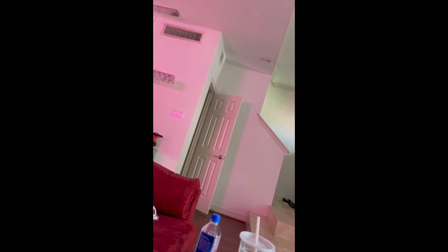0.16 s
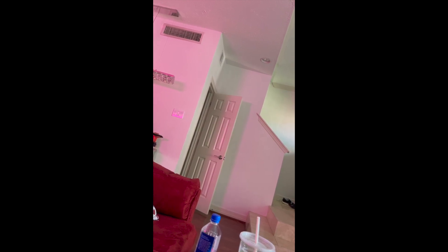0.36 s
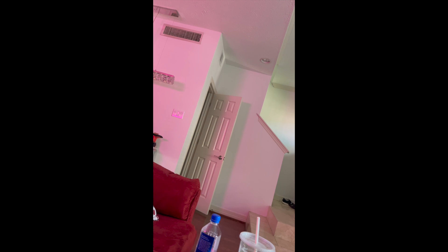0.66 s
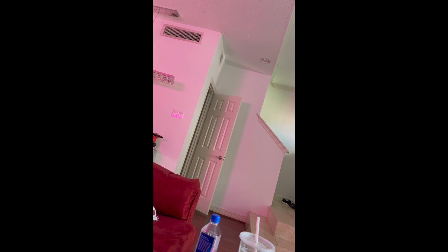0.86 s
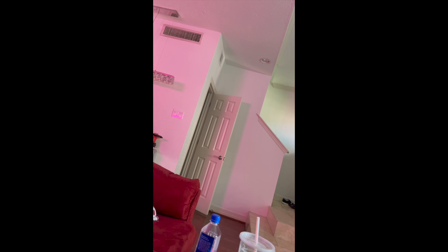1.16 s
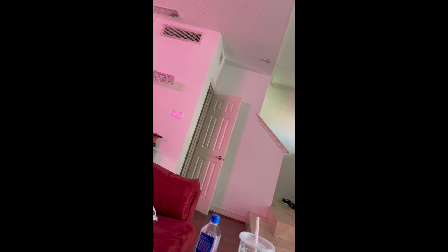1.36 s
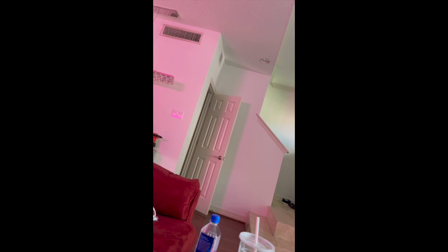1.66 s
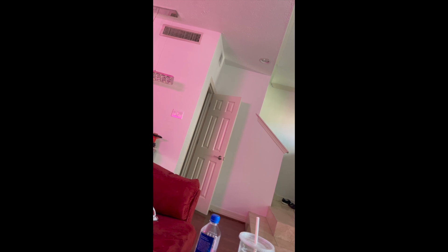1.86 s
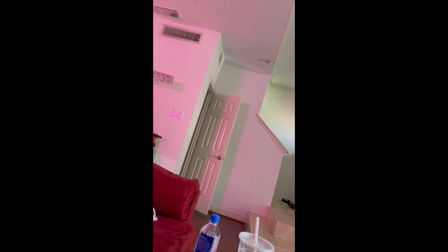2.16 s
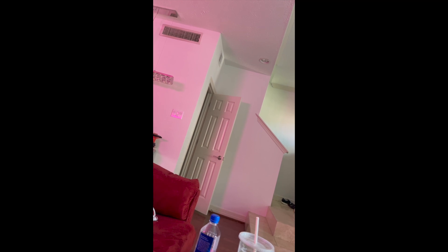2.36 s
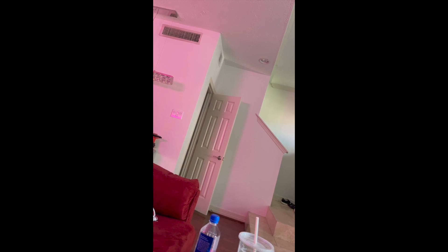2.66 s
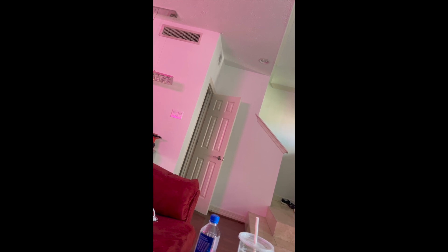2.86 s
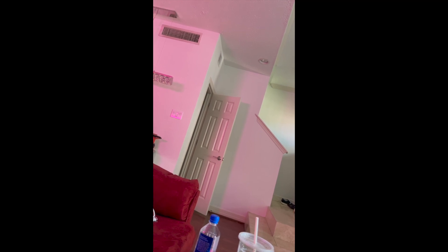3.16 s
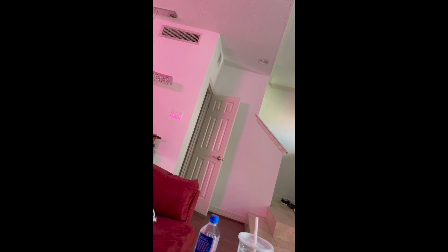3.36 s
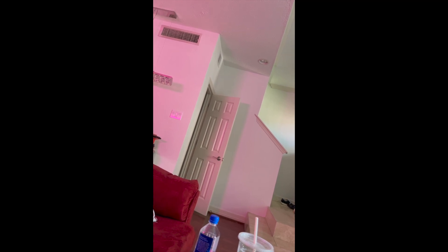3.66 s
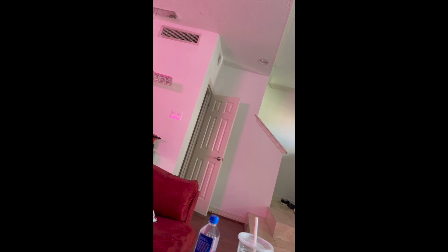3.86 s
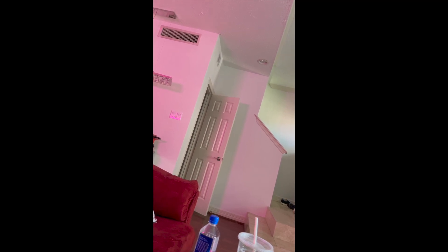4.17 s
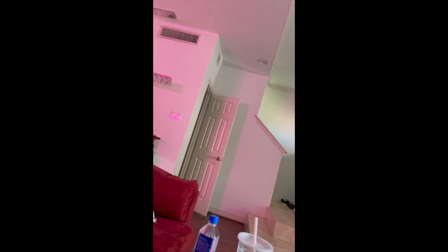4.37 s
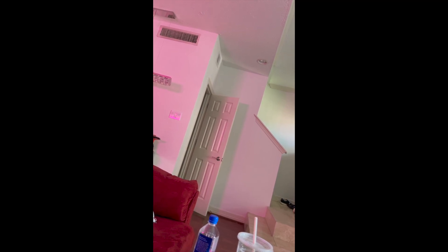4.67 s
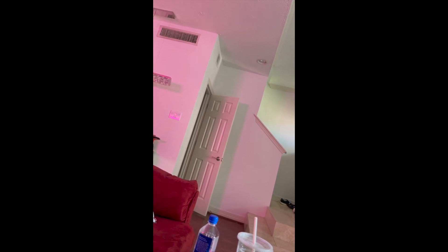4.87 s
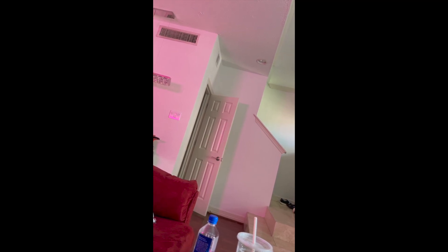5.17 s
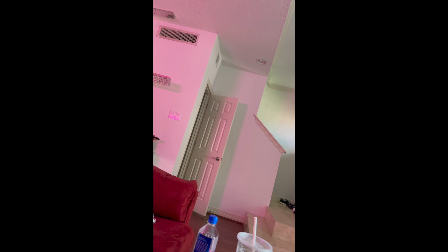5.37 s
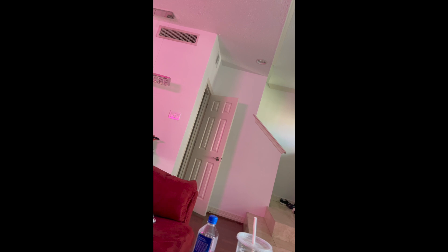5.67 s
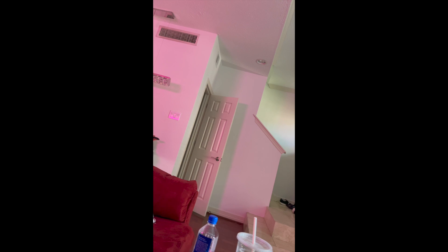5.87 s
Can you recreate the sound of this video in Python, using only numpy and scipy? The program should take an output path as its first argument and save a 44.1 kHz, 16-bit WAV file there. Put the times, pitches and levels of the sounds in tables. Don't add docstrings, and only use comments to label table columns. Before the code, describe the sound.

A hammer drill bursts through the wall for about two seconds, buzzing and gritty, over a steady low room hum and faint cloth rustles.

```python
import sys
import numpy as np
from scipy import signal
from scipy.fft import rfft, irfft, next_fast_len
from scipy.io import wavfile

SR = 44100
rng = np.random.default_rng(int(sys.argv[2]) if len(sys.argv) > 2 else 0)


def field_ratio(decibels):
    return 10 ** (np.asarray(decibels, dtype=float) / 20)


def wrap_up_sound(samples):
    columns = np.atleast_2d(samples).T
    tamed = np.clip(columns, -1, 1)
    steps = np.round(tamed * 32767).astype(np.int16)
    wavfile.write(sys.argv[1], SR, steps)


N = 264898

# (frequency [Hz], peak [dB], left over right [dB], wander [dB], start phase [turns])
HUM = [(55.107, -52, .8, .4, .36), (58.477, -56.5, .8, .6, .22), (58.761, -57, .8, .6, .62),
       (59.95, -55, .8, .5, .39), (116.933, -47.5, 1.5, .5, .68), (119.885, -66, 1.5, 1.5, .98),
       (165.3, -70, 3.0, 1.5, .1), (175.3, -67, 3.5, 1.5, .5), (204.6, -69, 4.0, 1.5, .3),
       (221.6, -70, 4.0, 1.5, .8), (277.6, -70, 5.0, 1.5, .6), (292.3, -68, 5.5, 1.1, .2),
       (323.9, -69, 6.0, 1.1, .9), (415.7, -67, 5.5, 1.1, .4), (475.0, -66, 5.0, 1.1, .7)]
# (frequency [Hz], level [dB/Hz])
VENT_MID = [(20, -32), (45, -7), (122, -10.5), (168, -14), (362, -21), (700, -28), (1640, -42),
            (2930, -46.5), (4500, -57.5), (7600, -63), (8700, -70.5), (11200, -73), (12800, -61),
            (14000, -64.5)]
VENT_SIDE = [(30, -32), (60, -14.5), (122, -1.5), (283, -9.5), (478, -4), (689, -6), (1330, -20),
             (1880, -24), (4800, -38), (6700, -45), (9400, -36.5), (11900, -45), (14000, -49.5)]
# (frequency [Hz], share of mid in side [1])
VENT_LEAN = [(60, 0.039), (200, 0.12), (370, 0.52), (670, 0.17), (1200, .05), (14000, .01)]
# (frequency [Hz], width [Hz], level [dB])
GRILLE = [(1854, 180, -79), (2670, 220, -92), (3520, 390, -89.5), (6110, 260, -105)]
# (middle [s], spread [s], level [dB])
RUSTLES = [
    (.36, .07, -81.5),
    (.7, 0.11, -77),
    (.84, .1, -85.5),
    (1.17, 0.054, -93),
    (1.63, 0.047, -75),
    (4.36, 0.07, -82),
    (5.4, 0.064, -80.5),
]
# (frequency [Hz], level [dB/Hz])
RUSTLE_SPECTRUM = [(1200, -11.5), (2000, 1.5), (2700, -2.5), (4200, -3.5), (5000, -15.5), (8000, -27),
                   (11000, -39), (13000, -19)]
# (start [s], length [s], level [dB])
WHISTLES = [
    (0.411, 0.19, -91),
    (0.655, 0.16, -94),
    (1.083, 0.1, -95),
            (5.09, 0.062, -90),
    (5.442, 0.044, -92),
    (5.663, 0.14, -85),
]
WHISTLE_HZ, WHISTLE_WIDTH_HZ = 6170, 210

# (time [s], rate [blows/s])
BLOW_RATE = [
    (1.75, 50.0),
    (2.3, 50.9),
    (2.45, 51.65),
    (2.92, 51.83),
    (3.0, 51.68),
    (3.25, 51.83),
    (3.4, 51.66),
    (3.84, 51.75),
    (4.08, 50.8),
]
# (start [s], end [s])
BITE_S = (2.33, 3.87)
# (time [s], level [dB])
MOTOR = [
    (1.7, -50),
    (1.71, -33),
    (1.74, -33.5),
    (1.92, -10.5),
    (2.16, -3.5),
    (2.36, -0.5),
    (3.91, -0.5),
    (4.11, -24.5),
    (4.31, -51),
]
# (time [s], level [dB])
PUSH = [
    (2.3, -1.5),
    (2.37, 2.5),
    (2.5, 0.9),
    (2.69, 3),
    (3.02, 0.85),
    (3.25, 3),
    (3.5, -4),
    (3.68, 1.5),
    (3.9, -3.2),
]
# (time [s], spread [s], multiple
# [1], spread [1], level [dB])
SINKING = [
    (2.42, .06, 15.0, 3.5, 7),
    (2.4, 0.37, 23.0, 1.6, -6.5),
    (2.6, 0.48, 33.0, 4.6, 2),
    (3.25, .15, 24.0, 2.6, 1),
    (3.5, 0.074, 42.0, 14, -5),
    (3.78, 0.22, 23.0, 3.9, 1.5),
    (4.02, 0.12, 7.5, 2.5, 7),
]
# (multiple of blow rate [1], left [dB], right [dB], left lead [rad])
WALL = [(2, -55, -57, 0.1), (4, -47, -51, -0.0), (5, -65, -65, 0.3), (7, -46, -54, -0.4),
        (8, -41, -46, -0.6), (9, -47, -53, -0.0), (10, -56, -55, -2.9), (11, -60, -52, -2.1),
        (12, -55, -47, 2.2), (13, -53, -48, 0.6), (14, -52, -52, -0.6), (15, -56, -53, 0.3),
        (16, -45, -51, -1.5), (17, -50, -56, -0.5), (18, -50, -54, 1.9), (19, -49, -50, -1.2),
        (20, -50, -43, 0.2), (21, -56, -52, 2.6), (22, -50, -47, 0.2), (23, -44, -46, -0.7),
        (24, -48, -50, -2.3), (25, -44, -44, -0.1), (26, -52, -51, -1.9), (27, -57, -49, 0.3),
        (28, -57, -54, -2.9), (29, -53, -48, -1.4), (30, -47, -48, 0.0), (31, -43, -43, -0.0),
        (32, -50, -44, -1.9), (33, -55, -43, -0.6)]
CEILING = [(34, -48, -49, -0.8), (35, -51, -49, 0.1), (36, -47, -50, -0.5), (37, -46, -49, 0.1),
           (38, -52, -53, -0.6), (39, -55, -56, -0.5), (40, -56, -63, -0.8), (41, -56, -50, 1.4),
           (42, -50, -50, 1.2), (43, -54, -57, -1.5), (44, -46, -56, -1.4), (45, -51, -57, 2.9),
           (46, -50, -49, -0.5), (47, -50, -53, 1.1), (48, -54, -54, -1.1), (49, -50, -52, -0.5),
           (50, -56, -54, -2.1), (51, -54, -51, 0.3), (52, -57, -54, -0.3), (53, -51, -50, 2.5),
           (54, -51, -58, 2.6), (55, -60, -56, -0.3), (56, -54, -51, -2.6), (57, -58, -50, -1.6),
           (58, -58, -55, -0.8), (59, -55, -53, -0.3), (60, -60, -55, -0.1), (61, -58, -61, 0.1),
           (62, -62, -59, -1.9), (63, -59, -64, 1.1)]
MODE_WIDTH_HZ = 20.8
# (frequency [Hz], level [dB])
RATTLE = [(2700, -41), (3300, -2), (3800, 2), (4400, 3.5), (5000, -8.5), (6000, -21.5), (7500, -21.5)]
# (frequency [Hz], level [dB/Hz])
GRIND_MID = [(88, -42.5), (150, -7), (252, 2), (380, -2.5), (510, -1.5), (680, 2), (1000, -0.5), (1650, 3),
             (2200, -5), (3000, -28.5), (4500, -35)]
GRIND_SIDE = [(88, -49.5), (150, -13), (380, -2.5), (930, 0), (1500, 1.5), (2200, -14), (3000, -21),
              (4500, -31)]
GRIT_MID = [(1200, -6.5), (2000, 0), (2700, 1), (3300, -5), (4440, -7), (4970, -12), (5400, -14.5),
            (6800, -31), (8800, -45)]
GRIT_SIDE = [(1200, -31), (2000, -5.5), (2800, -6), (3900, -14), (4760, -15), (5400, -22), (7000, -45)]
AIR_MID = [(3500, -35.5), (5200, -7), (6700, -11.5), (7500, -5.5), (8980, -0.5), (9800, -5.5), (10300, -24),
           (11000, -8), (11800, -10.5), (12700, -11.5), (13300, -17), (14000, -29.5)]
AIR_SIDE = [(3240, -51), (5500, -18), (6660, -26), (7550, -8.5), (8960, 4), (11700, -6.5), (13200, -27),
            (14000, -46)]
BLOW_DB, GRIND_DB, GRIT_DB, AIR_DB = -46.5, -37.5, -43.5, -47
SPIN_SHARES = (.85, 0.83, 0.71, 0.99)
PUSH_SHARES = (.5, .85, 1.2, .4)
FIRST_BLOW_DB, FIRST_BLOW_S = 9.5, 0.02
CLEARS_S, CLEARS_OVER_S, CLEARS_DB = 3.7, 0.09, -8


def in_time(rows):
    s, *columns = np.transpose(rows)
    return [np.interp(np.arange(N) / SR, s, column) for column in columns]


def at_hz(points, hz):
    point_hz, value = np.transpose(points)
    return np.interp(np.log(hz + 1), np.log(point_hz), value)


def rms_one(x):
    return x / np.sqrt(np.mean(x ** 2) + 1e-20)


def weigh(x, gain_at):
    size = next_fast_len(len(x))
    gain = gain_at(np.fft.rfftfreq(size, 1 / SR))
    return irfft(rfft(x, size) * gain, size)[:len(x)]


def colour(x, spectrum):
    return weigh(x, lambda hz: field_ratio(at_hz(spectrum, hz)))


def drift(rate_hz):
    r = np.exp(-128 * np.pi * rate_hz / SR)
    noise = rng.standard_normal(N // 64 + 2002)
    slow = signal.lfilter([1], [1, -2 * r, r * r], noise)[2000:]
    return np.interp(np.arange(N) / 64, np.arange(len(slow)), rms_one(slow - slow.mean()))


def stereo_noise(mid_spectrum, side_spectrum, side_db):
    mid = rms_one(colour(rng.standard_normal(N), mid_spectrum))
    side = field_ratio(side_db) * rms_one(colour(rng.standard_normal(N), side_spectrum))
    return np.array([mid + side, mid - side])


def hum():
    t, out = np.arange(N) / SR, np.zeros((2, N))
    for hz, peak_db, pan_db, wander_db, turns in HUM:
        level = field_ratio(peak_db + wander_db * drift(0.072))
        tone = level * np.sin(2 * np.pi * (hz * t + turns))
        out += tone * field_ratio(np.array([[0.5], [-0.5]]) * pan_db)
    return out


def ventilation(level_db, side_db):
    mid = rms_one(colour(rng.standard_normal(N), VENT_MID))
    lean = weigh(mid, lambda hz: at_hz(VENT_LEAN, hz))
    side = lean + field_ratio(side_db) * rms_one(colour(rng.standard_normal(N), VENT_SIDE))
    gust = field_ratio(0.6 * drift(1.5))
    return field_ratio(level_db) * gust * np.array([mid + side, mid - side])


def grille(wander_db):
    out = np.zeros((2, N))
    for hz, width_hz, level_db in GRILLE:
        edges_hz = [hz - width_hz / 2, hz + width_hz / 2]
        band = signal.butter(2, edges_hz, "band", fs=SR, output="sos")
        level = field_ratio(level_db + wander_db * drift(4.1))
        out += level * rms_one(signal.sosfilt(band, rng.standard_normal((2, N))))
    return out


def swells(rows):
    t = np.arange(N) / SR
    return sum(field_ratio(db) * np.exp(-((t - s) / spread_s) ** 2) for s, spread_s, db in rows)


def rustles():
    patches = field_ratio(2.5 * drift(25.0))
    return swells(RUSTLES) * patches * stereo_noise(RUSTLE_SPECTRUM, RUSTLE_SPECTRUM, side_db=-1.0)


def whistles(level_db):
    r = np.exp(-np.pi * WHISTLE_WIDTH_HZ / SR)
    poles = [1, -2 * r * np.cos(2 * np.pi * WHISTLE_HZ / SR), r * r]
    mid, side = rng.standard_normal((2, N))
    tone = mid + 0.3 * side * np.array([[1], [-1]])
    for _ in range(2):
        tone = signal.lfilter([1, 0, -1], poles, tone)
    draughts = [(s + length_s / 2, 0.42 * length_s, db + level_db)
                for s, length_s, db in WHISTLES]
    return rms_one(tone) * swells(draughts)


def effort():
    t, motor_db, push_db = np.arange(N) / SR, in_time(MOTOR)[0], in_time(PUSH)[0]
    layers = zip((BLOW_DB, GRIND_DB, GRIT_DB, AIR_DB), SPIN_SHARES, PUSH_SHARES)
    blow_db, grind_db, grit_db, air_db = [db + spin * motor_db + lean * push_db
                                          for db, spin, lean in layers]
    blow_db = blow_db + FIRST_BLOW_DB * np.exp(-np.abs(t - BITE_S[0]) / FIRST_BLOW_S)
    grit_db = grit_db + CLEARS_DB * np.clip((t - CLEARS_S) / CLEARS_OVER_S, 0, 1)
    return blow_db, grind_db, grit_db, air_db


def stroke_turns():
    return np.cumsum(in_time(BLOW_RATE)[0]) / SR


def blows(jitter_s, loose_jitter_s, uneven_db, idle_db):
    turns = stroke_turns()
    count = int(turns[-1])
    chance = rng.standard_normal((400, 2))[:count]
    at = np.interp(np.arange(count), turns, np.arange(N))
    loose = (at < BITE_S[0] * SR) | (at > BITE_S[1] * SR)
    running = (at > BLOW_RATE[0][0] * SR) & (at < BLOW_RATE[-1][0] * SR)
    settling_s = 0.00015 * np.exp(-np.abs(at / SR - BITE_S[0]) / 0.06)
    spread_s = np.where(loose, loose_jitter_s, jitter_s + settling_s)
    at = at + spread_s * SR * chance[:, 0]
    clicks = np.full(N, 1e-18)
    index = np.clip(np.round(at).astype(int), 0, N - 1)
    clicks[index] = field_ratio(uneven_db * chance[:, 1] + idle_db * loose) * running
    return clicks


def modes(clicks, table, wander_db, level_db):
    out, r = np.zeros((2, N)), np.exp(-np.pi * MODE_WIDTH_HZ / SR)
    start, stop = int(1.6 * SR), int(4.4 * SR)
    at = np.flatnonzero(clicks[start:stop] > 1e-15)
    stroke = np.exp(2j * np.pi * stroke_turns())[start:stop]
    s, spread_s, middle, spread, db = np.transpose(SINKING)
    seating = np.exp(-(((start + at[:, None]) / SR - s) / spread_s) ** 2)
    overtone, reached = np.ones(stop - start, complex), 0
    for multiple, left_db, right_db, lead_rad in table:
        overtone = overtone * stroke ** int(multiple - reached)
        reached = multiple
        bloom_db = seating @ (db * np.exp(-((multiple - middle) / spread) ** 2))
        coupling_db = bloom_db + wander_db * np.sqrt(multiple) * drift(7.7)[start + at]
        fed = np.full(stop - start, 1e-18, complex)
        fed[at] = clicks[start + at] * field_ratio(coupling_db) / overtone[at]
        gain = (1 - r) ** 2 * np.exp(2j * np.pi * rng.random())
        ringing = overtone * signal.lfilter([gain], [1, -2 * r, r * r], fed)
        out[0, start:stop] += field_ratio(left_db + level_db) * ringing.real
        out[1, start:stop] += field_ratio(right_db + level_db) * (ringing * np.exp(-1j * lead_rad)).real
    return out


def rattle(clicks, t60_s, wander_db, level_db, side_db):
    t = np.arange(SR // 2) / SR
    out = np.zeros((2, N))
    for path in range(3):
        fed = clicks * field_ratio(wander_db * drift(4.9))
        for part in range(2):
            noise = rms_one(colour(rng.standard_normal(len(t)), RATTLE))
            out[part] += signal.fftconvolve(fed, noise * field_ratio(-60 * t / t60_s))[:N]
    mid, side = out[0], field_ratio(side_db) * out[1]
    return field_ratio(level_db) * np.array([mid + side, mid - side])


def drill():
    blow_db, grind_db, grit_db, air_db = effort()
    clicks = blows(jitter_s=0.00003, loose_jitter_s=0.0015, uneven_db=1.4, idle_db=-1.5)
    struck = modes(clicks * field_ratio(blow_db), WALL, wander_db=0.4749, level_db=105.5)
    struck += modes(clicks * field_ratio(grind_db), CEILING, wander_db=0.66, level_db=95.5)
    struck += rattle(clicks * field_ratio(grit_db), t60_s=0.2, wander_db=1.1, level_db=-6.5, side_db=-6.5)

    bite, lift = BITE_S
    pressed = in_time([(bite - 0.03, 0), (bite + 0.12, 1), (lift - 0.05, 1), (lift, 0)])[0]
    grind_level = field_ratio(grind_db - 13.6 * pressed + 0.84 * drift(3.6))
    grind = grind_level * stereo_noise(GRIND_MID, GRIND_SIDE, side_db=-5.5)
    grit_level = field_ratio(grit_db - 3.4 * pressed + 0.99 * drift(2.3))
    grit = grit_level * stereo_noise(GRIT_MID, GRIT_SIDE, side_db=-0.5)
    pulse = 1 + 0.045 * np.cos(2 * np.pi * stroke_turns())
    air_level = field_ratio(air_db + 0.81 * drift(51.0)) * pulse
    air = air_level * stereo_noise(AIR_MID, AIR_SIDE, side_db=8.5)

    on, off = MOTOR[0][0], MOTOR[-1][0]
    sounding = in_time([(on - 0.05, 0), (on, 1), (off, 1), (off + 0.1, 0)])[0]
    return struck + sounding * (grind + grit + air)


def scene():
    room = drill() + hum() + grille(wander_db=2.5) + ventilation(level_db=-55.0, side_db=-10.0)
    return room + whistles(level_db=5.5) + rustles()


def band_level_db(bins):
    return 10 * np.log10(np.sum(np.abs(bins) ** 2, axis=0) + 1e-20)


def drop_weak_treble(mid, margin_db, chance_db):
    hz, s, z = signal.stft(mid, SR, nperseg=2048, noverlap=1024)
    loud_db = band_level_db(z[hz > 500])
    held_db = np.maximum.accumulate(loud_db + 62 * s) - 62 * s
    floor_db = held_db - margin_db - 30 * (loud_db < -64)
    for low in range(512, 672, 32):
        band_db = band_level_db(z[low:low + 32])
        z[low:low + 32] *= band_db > floor_db + chance_db * rng.standard_normal(len(s))
    for low in range(256, 344, 8):
        band_db = band_level_db(z[low:low + 8])
        valley_floor_db = loud_db - margin_db - 5.5 + chance_db * rng.standard_normal(len(s))
        z[low:low + 8] *= (band_db > valley_floor_db) | (loud_db < -52)
    return signal.istft(z, SR, nperseg=2048, noverlap=1024)[1][:N]


def band_limit(x):
    return signal.sosfilt(signal.butter(12, 14130, fs=SR, output="sos"), x)


def record(dry):
    mid = drop_weak_treble(dry.mean(axis=0), margin_db=31.5, chance_db=2.5)
    side = (dry[0] - dry[1]) / 2
    mix = np.array([mid + side, mid - side])
    return band_limit(mix)


dry = scene()
out = record(dry)
wrap_up_sound(out)
```